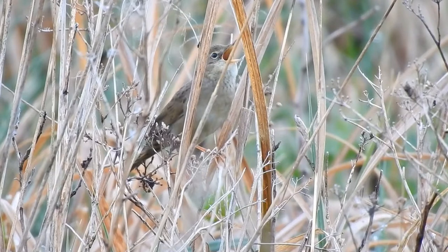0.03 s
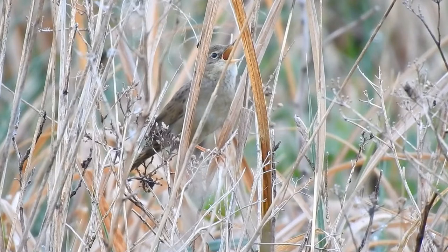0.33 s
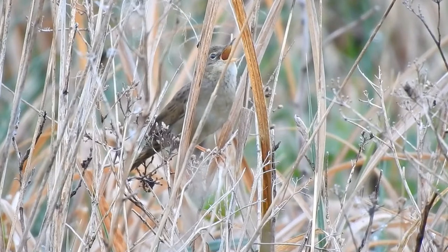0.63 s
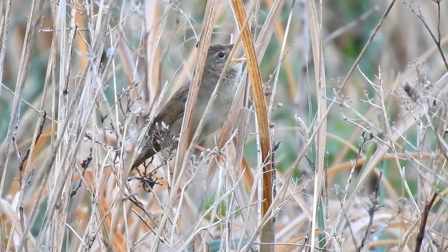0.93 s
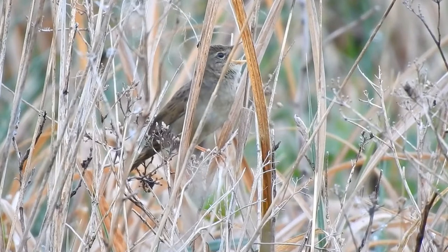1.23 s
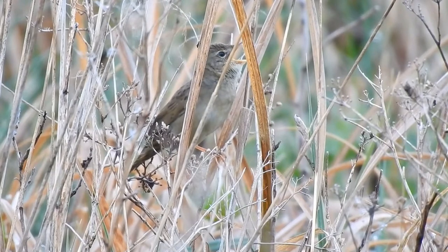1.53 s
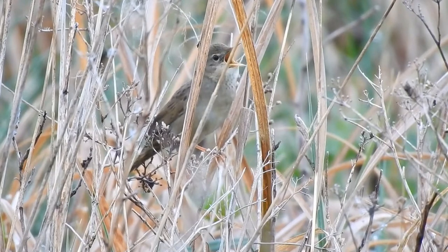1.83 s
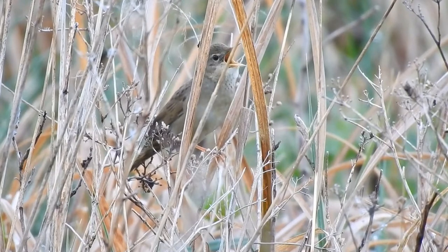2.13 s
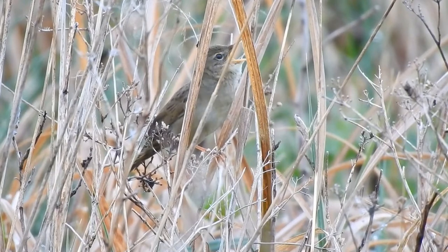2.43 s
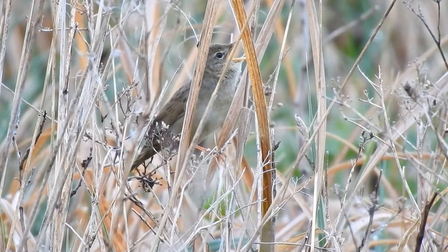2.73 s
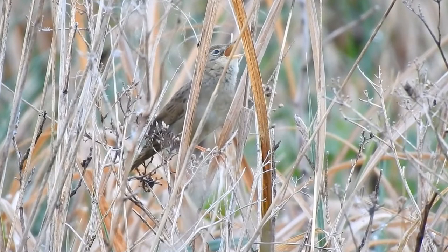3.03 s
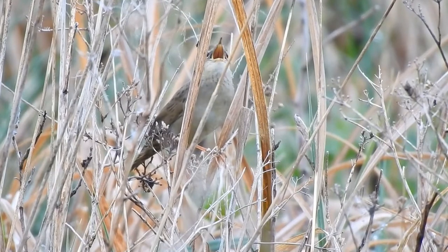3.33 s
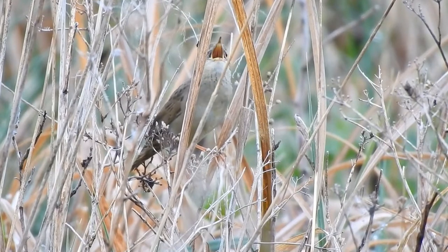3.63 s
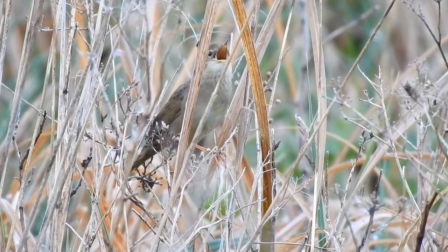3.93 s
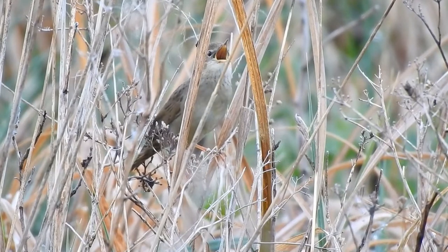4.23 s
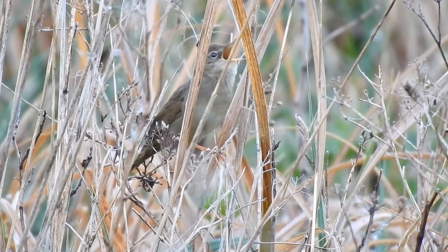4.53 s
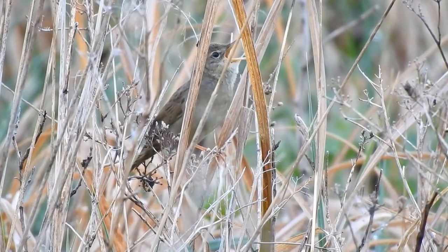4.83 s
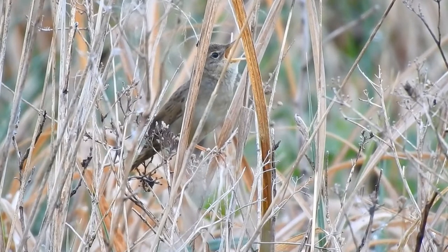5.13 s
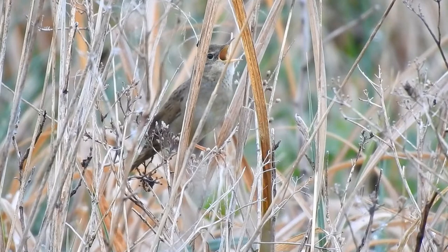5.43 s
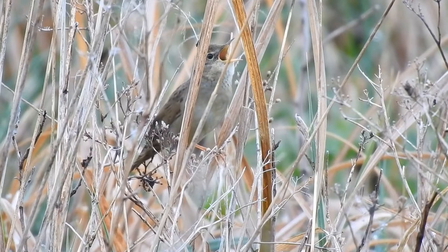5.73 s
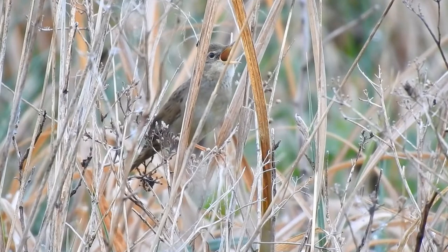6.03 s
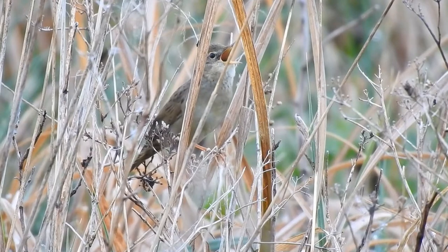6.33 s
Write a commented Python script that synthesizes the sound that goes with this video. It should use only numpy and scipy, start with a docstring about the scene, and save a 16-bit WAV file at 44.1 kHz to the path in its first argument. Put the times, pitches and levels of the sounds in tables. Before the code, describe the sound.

A small warbler sings close to the microphone in an open reed bed. Its song is one unbroken, very high, insect-like trill of rapid ticks and tiny pure notes, with a soft hiss around it. Far birds whistle faintly throughout and now and then give hoarse calls, a little more often toward the end. A soft wash of open air and a low rumble lie underneath.

```python
"""A reed bed in the open air. A soft wash and a low rumble lie underneath, and far birds call
hoarsely (sliding bands of noise) and whistle (bending sine tones). Up close a small warbler reels
about 26 syllables a second, each a sharp rising tick and a short pure note from its syrinx.
Stems scatter the song back, a soft hiss swells with it, and the top treble flickers."""
import sys
import numpy as np
from scipy import signal
from scipy.fft import rfft, irfft, next_fast_len
from scipy.io import wavfile
from scipy.ndimage import uniform_filter1d

SR = 44100
rng = np.random.default_rng(int(sys.argv[2]) if len(sys.argv) > 2 else 0)


def transcribe(u):
    """Save the signal u as a 16-bit wav file named by the first command-line argument.

    u: samples, shape (n,) or (channels, n), limited to [-1, 1]; the rate is SR.
    q: integer samples, one column per channel.
    """
    v = np.clip(np.atleast_2d(u).T, -1, 1)
    q = np.round(v * 32767).astype(np.int16)
    wavfile.write(sys.argv[1], SR, q)


N = 280917


def amp(db):
    """Decibels to gain."""
    return 10 ** (np.asarray(db) / 20)


def unit_rms(x):
    """Scales to rms 1."""
    return x / np.sqrt(np.mean(x ** 2) + 1e-20)


def curve_at(curve, s):
    """Reads an automation curve at times s."""
    return np.interp(s, *np.transpose(curve))


def spectrum_at(points, hz):
    """Reads a spectrum on a log-frequency axis."""
    knots_hz, value = np.transpose(points)
    return np.interp(np.log(hz + 1), np.log(knots_hz + 1), value)


def add(mix, s, sound):
    """Drops a sound into the mix at time s, trimmed to fit."""
    start = round(s * SR)
    sound = sound[..., max(-start, 0):]
    part = mix[..., max(start, 0):][..., :sound.shape[-1]]
    part += sound[..., :part.shape[-1]]


def pan(balance_db):
    """Left and right gains; positive leans left."""
    return amp([[balance_db / 2], [-balance_db / 2]])


def wander(n, top_hz):
    """Random modulation of rms about 1, rolling off above top_hz."""
    hz = np.fft.rfftfreq(n + SR, 1 / SR)
    return unit_rms(irfft(rfft(rng.standard_normal(n + SR)) / (1 + (hz / top_hz) ** 4)))[:n]


def coloured_noise(spectrum):
    """Two independent channels of noise with the given spectrum, rms about 1."""
    size = next_fast_len(N)
    colour = amp(spectrum_at(spectrum, np.fft.rfftfreq(size, 1 / SR)))
    return unit_rms(irfft(rfft(rng.standard_normal((2, size))) * colour, size))[:, :N]


def reverb(x, t60_s, onset_s):
    """Scattered sound: x through a diffuse tail of energy 1, different at each ear."""
    t = np.arange(SR) / SR
    tail = rng.standard_normal((2, SR)) * 1e-3 ** (t / t60_s) * (1 - np.exp(-t / onset_s))
    tail /= np.linalg.norm(tail, axis=1, keepdims=True)
    return signal.fftconvolve(x[None], tail, axes=1)[:, :N]


# Tone of the outdoor bed: freq_hz, relative_density_db
WASH_SPECTRUM = [(20, -30), (40, -20.5), (62, 3.5), (95, 0), (130, -5), (200, -16), (400, -17),
                 (1050, -13.5), (1600, -18.5), (2600, -21), (3700, -23.5), (8500, -34.5), (15500, -44),
                 (17000, -52.5)]
# Its stereo width, where 1 is fully coherent: freq_hz, coherence_ratio
WASH_COHERENCE = [(60, 1), (250, 0.76), (1000, 0.82), (3000, 0.53), (12000, 0.9)]
# Its lean: freq_hz, left_minus_right_db
WASH_BALANCE = [(60, -1.5), (200, 0.5), (500, 0), (1000, 2.5), (2500, -1.5), (9000, -0.5)]
# Slow rides on its bands around 350 Hz and 1 kHz: time_s, low_gain_db, mid_gain_db
WASH_DRIFT = [(0, 1.5, 1.5), (1.599, 2, 2.5), (2.802, 3, -0.5), (4.199, 5, -1.5), (5.401, 5, -0.5),
              (6.4, 7.5, -1)]


def outdoor_wash(level_db=-50, patchy_db=2.5, steady_below_hz=200):
    """Steady distant rumble, nearly mono, under an airy hiss with drifting patches."""
    frame, hop = 4096, 1024
    hz = np.fft.rfftfreq(frame, 1 / SR)
    t = np.arange(0, N + frame + hop, hop) / SR
    noise = rng.standard_normal((5, len(t), len(hz)))
    left, independent = noise[0] + 1j * noise[1], noise[2] + 1j * noise[3]
    patches = uniform_filter1d(noise[4], size=6, axis=0)
    patches = unit_rms(uniform_filter1d(patches, size=24, axis=1)) * hz / (hz + steady_below_hz)
    s, low_db, mid_db = np.transpose(WASH_DRIFT)
    low_band = spectrum_at([(180, .053), (350, 1), (700, .36)], hz)
    mid_band = spectrum_at([(450, .35), (1000, .99), (2200, 0)], hz)
    drift_db = np.outer(np.interp(t, s, low_db), low_band) + np.outer(np.interp(t, s, mid_db), mid_band)
    coherence = spectrum_at(WASH_COHERENCE, hz)
    right = coherence * left + np.sqrt(1 - coherence ** 2) * independent
    lean = amp(spectrum_at(WASH_BALANCE, hz) / 2)
    spectra = np.array([left * lean, right / lean])
    spectra *= amp(spectrum_at(WASH_SPECTRUM, hz) + patchy_db * patches + drift_db)
    _, bed = signal.istft(spectra.swapaxes(1, 2), nperseg=frame, noverlap=frame - hop)
    return amp(level_db) * unit_rms(bed[:, :N])


# Cues for the hoarse far birds: start_s, length_s, start_hz, end_hz, width_hz, relative_level_db
HOARSE_CUES = [(0.649, 0.26, 2210, 2023, 595, -56), (1.599, 0.49, 1848, 1960, 400, -57.5),
               (3.001, 0.63, 2017, 1932, 350, -56), (4.1, 0.34, 1947, 1907, 400, -59),
               (4.464, 0.3, 2117, 1874, 320, -51.5), (4.719, 0.53, 1960, 1867, 278, -54.5),
               (5.702, .65, 2150, 1890, 604, -52.5), (5.933, 0.22, 2090, 1904, 260, -53),
               (5.96, 0.23, 2317, 2300, 301, -54.5)]


def hoarse_calls(level_db=-3, skirt_db=-7, skirt_spread=1.4, wet_db=-4, balance_db=-5):
    """Rough calls so far away that each is smeared into one sliding band with broad skirts."""
    calls = np.zeros(N)
    for s, length_s, start_hz, end_hz, width_hz, db in HOARSE_CUES:
        n = int(length_s * SR)
        carrier = np.exp(2j * np.pi * np.cumsum(np.linspace(start_hz, end_hz, n)) / SR)
        core, skirt = (wander(n, hz) + 1j * wander(n, hz)
                       for hz in (width_hz / 2, width_hz * skirt_spread))
        band = ((core + amp(skirt_db) * skirt) * carrier).real
        add(calls, s, amp(db) * band * signal.windows.tukey(n, 3 / 5))
    tail = amp(wet_db) * reverb(calls, t60_s=.69, onset_s=.021)
    return amp(level_db) * pan(balance_db) * (calls + tail)


def faint_whistle_cues(slot_s=.2, length_s=(.036, .075), pitch_hz=(2544, 3070), bend_hz=230, db=-60):
    """One short whistle in every time slot, random in onset, length, pitch and bend."""
    slots = np.arange(0, N / SR, slot_s)
    cues = []
    for s, (late, long, high, *bend) in zip(slots, rng.random((len(slots), 6))):
        contour_hz = np.interp(high, [0, 1], pitch_hz) + bend_hz * (2 * np.array(bend) - 1)
        cues.append((s + slot_s * late, np.interp(long, [0, 1], length_s), *contour_hz, db))
    return cues


def dipping_whistle_cues(first_s=2.872, every_s=.1328, length_s=.08, db=-55.5):
    """One far bird repeats a dipping whistle six times at an even pace."""
    contour_hz = (3190, 2440, 3690)
    return [(first_s + k * every_s, length_s, *contour_hz, db) for k in range(6)]


# Cues for the clearer far whistles: start_s, length_s, start_hz, middle_hz, end_hz, level_db
WHISTLE_CUES = [(0.143, 0.16, 2920, 3110, 3250, -62), (0.354, .097, 2640, 2660, 2500, -57),
                (.69, 0.11, 2850, 2530, 2500, -62.5), (0.93, 0.082, 3050, 2650, 2590, -54.5),
                (1.028, .08, 2570, 2640, 2570, -56), (1.29, 0.16, 2660, 2540, 2440, -62.5),
                (2.2, .048, 2860, 2830, 2620, -59.5), (2.272, .038, 2800, 2650, 2500, -59),
                (2.412, 0.16, 3430, 3390, 3480, -59), (2.76, 0.038, 2650, 2960, 3150, -58),
                (3.683, 0.062, 3250, 2480, 2750, -55.5), (3.996, 0.11, 2680, 2650, 2700, -58.5),
                (4.691, 0.11, 2950, 2400, 2520, -58), (4.837, 0.059, 2950, 3070, 3050, -58),
                (4.929, 0.065, 3240, 2650, 2495, -54.5), (5.0, 0.14, 2520, 2540, 2280, -60),
                (5.332, .1, 2650, 3110, 2550, -53.5), (5.472, .089, 2700, 3150, 2480, -55),
                (5.528, 0.065, 2440, 2470, 2360, -56.5), (5.69, 0.088, 2780, 2700, 2540, -54.5),
                (5.79, 0.069, 2700, 2490, 2750, -52.5), (5.82, .07, 3160, 3080, 2970, -54.5),
                (6.195, 0.085, 2680, 3110, 2560, -54.5), (6.33, 0.045, 2980, 2560, 2500, -57),
                (6.335, 0.066, 2940, 3130, 3100, -51.5)]


def far_whistles(waver_share=.011, flutter_db=3.5, wet_db=-4.5, balance_db=-1):
    """Arched and dipping sine whistles, a little blurred by distance."""
    whistles = np.zeros(N)
    for s, length_s, *contour_hz, db in WHISTLE_CUES + dipping_whistle_cues() + faint_whistle_cues():
        n = int(length_s * SR)
        arch = np.polyfit([0, 1 / 2, 1], contour_hz, 2)
        hz = np.polyval(arch, np.linspace(0, 1, n)) * (1 + waver_share * wander(n, top_hz=120))
        envelope = amp(db + flutter_db * wander(n, top_hz=77)) * signal.windows.tukey(n, 1 / 6)
        add(whistles, s, envelope * np.sin(2 * np.pi * np.cumsum(hz) / SR))
    tail = amp(wet_db) * reverb(whistles, t60_s=.44, onset_s=.016)
    return pan(balance_db) * (whistles + tail)


# Tone of the treble flicker: freq_hz, relative_density_db
FLICKER_SPECTRUM = [(2000, -13.5), (4000, -2.5), (8500, 3.5), (12000, -0.5), (16000, -5.5)]


def treble_flicker(song, level_db=-38, open_share=.3, balance_db=2):
    """Faint bright fizz rides the song's envelope, gated at random so only some pulses carry it."""
    fizz = coloured_noise(FLICKER_SPECTRUM)
    chance = wander(N, top_hz=38)
    is_open = chance > np.quantile(chance, 1 - open_share)
    gate = uniform_filter1d(is_open.astype(float), size=100)
    envelope = abs(signal.hilbert(song))
    return amp(level_db) * pan(balance_db) * envelope * gate * fizz


# Tone of the hiss around the song band: freq_hz, relative_density_db
SHIMMER_SPECTRUM = [(3300, -43.5), (4100, -28.5), (4700, -8), (5100, -4.5), (5400, 0.5), (6500, -1),
                    (6900, -2.5), (7250, -13.5), (7600, -17), (8100, -35.5), (9000, -56)]


def shimmer(song, level_db=-21, pulse_weight=.043, side_db=-9):
    """A soft hiss swells with the song and lingers between its pulses."""
    mid, side = coloured_noise(SHIMMER_SPECTRUM)
    side *= amp(side_db)
    syllable_power = uniform_filter1d(song ** 2, size=1690)
    pulse_power = uniform_filter1d(song ** 2, size=60)
    envelope = np.sqrt(abs(syllable_power + pulse_weight * pulse_power))
    return amp(level_db) * envelope * np.array([mid + side, mid - side])


# Echo taps off the nearest stems and the ground: delay_ms, left_db, right_db
STEM_ECHOES = [(4.713, -29.5, -14), (7.63, -26.5, -33), (9.36, -29, -24.5), (11.8, -45, -27.5),
               (14.52, -37, -28.5), (16.97, -32, -32), (20.67, -40, -23.5), (24.98, -37, -33.5),
               (25.6, -38.5, -15), (28.56, -29, -31), (29.56, -42.5, -26.5), (33.76, -35.5, -22)]


def reed_bed(song, direct_balance_db=-.7, near_db=-19, far_db=-25, tail_balance_db=-3):
    """Direct song, single echoes off near stems, and the scatter of the whole reed bed."""
    size = next_fast_len(N + SR)
    khz = np.fft.rfftfreq(size, 1000 / SR)
    echoes = sum(amp([[left_db], [right_db]]) * np.exp(-2j * np.pi * khz * delay_ms)
                 for delay_ms, left_db, right_db in STEM_ECHOES)
    early = irfft(rfft(song, size) * (pan(direct_balance_db) + echoes), size)[:, :N]
    near_tail = amp(near_db) * reverb(song, t60_s=.19, onset_s=.002)
    far_tail = amp(far_db) * reverb(song, t60_s=.41, onset_s=.016)
    return early + pan(tail_balance_db) * (near_tail + far_tail)


def throat(song, cutoff_hz=7130, steepness=40, leak_db=-15):
    """Throat and beak pass the song band and drop steeply to a low shelf above it."""
    size = next_fast_len(N + SR)
    hz = np.fft.rfftfreq(size, 1 / SR)
    passed = 1 / (1 + (hz / cutoff_hz) ** steepness)
    return irfft(rfft(song, size) * (passed + amp(leak_db) * (1 - passed)), size)[:N]


def syrinx_pulse(contour, pitch_scale, stretch, uneven_db=2, pad=9):
    """One sine pulse of the syrinx along a contour of pitch and smoothed level."""
    ms, pitch, db = np.transpose(contour)
    knots_s = ms * stretch / 1000
    t = np.arange(-pad, knots_s[-1] * SR + pad) / SR
    weakness = 1 - amp(np.minimum(db, 0))  # weak parts vary most
    db = db + uneven_db * rng.standard_normal(len(db)) * weakness
    smoothing = np.hanning(2 * pad) / (pad - 1 / 2)
    envelope = np.convolve(np.interp(t, knots_s, amp(db), 0, 0), smoothing, "same")
    hz = pitch_scale * np.interp(t, knots_s, pitch)
    return envelope * np.sin(2 * np.pi * np.cumsum(hz) / SR)


# Tempo of the reel: time_s, syllable_rate_hz
REEL_TEMPO = [(0.0, 26.235), (0.8, 26.109), (1.8, 26.308), (2.0, 26.262), (3.2, 26.216), (3.6, 25.904),
              (3.8, 26.064), (4.4, 26.033), (5.0, 26.293), (5.2, 25.906), (5.8, 26.08), (6.0, 26.502),
              (6.4, 25.505)]


def syllable_times(first_s=-.003):
    """One syllable onset for each whole cycle of the tempo."""
    t = first_s + np.arange(N) / SR
    cycles = np.cumsum(curve_at(REEL_TEMPO, t)) / SR
    return np.interp(np.arange(np.ceil(cycles[-1])), cycles, t)


# The tick sweeps up, then trails off weakly: time_ms, pitch_hz, relative_level_db
TICK_CONTOUR = [(.1, 4640, -42), (.45, 5380, -15.4), (.8, 6020, -3.1), (1.3, 6210, 0), (1.6, 6550, -.9),
                (1.95, 6960, -10.8), (2.45, 6390, -5.1), (3.1, 6310, -19.7), (3.6, 5320, -21.2),
                (4.6, 6470, -12), (5.8, 5840, -23), (7, 6420, -13.7), (8.2, 6580, -20.5),
                (9.6, 6590, -34.7)]
# The note sags gently: time_ms, pitch_ratio, relative_level_db
NOTE_CONTOUR = [(0, 1.02, -34), (.5, 1.017, -11), (.8, 1.014, -4.5), (1.3, 1.01, -1), (2.4, .999, .3),
                (3.1, .994, -.4), (3.6, .99, -3.2), (4.2, .972, -8.5), (4.8, .958, -11.5), (5.9, .965, -32)]
# The note's tuning drifts a little along the reel: time_s, pitch_hz
NOTE_TUNING = [(0, 5770), (1.4, 5798), (3.9, 5756), (6.4, 5730)]
# Strength of the song as the bird pushes and turns its head: time_s, effort_db
SONG_EFFORT = [(0.0, -10), (0.9, -9.5), (1.0, -13.5), (1.1, -12), (2.0, -10.5), (2.5, -11), (2.7, -12.5),
               (3.0, -12), (3.6, -9.5), (4.6, -9.5), (4.8, -12.5), (4.9, -10.9), (5.1, -12), (5.7, -10.7),
               (5.8, -11.5), (5.9, -10.6), (6.0, -12), (6.4, -10)]


def warbler(tick_db=1.67, note_db=-1.12, note_delay_ms=12.03):
    """Tick and note alternate, both following the effort; no two syllables are quite alike."""
    tick_follows, note_follows = 1.123, .9  # dB per dB of effort
    tick_jitter_db, note_jitter_db, jitter_hz, jitter_ms = .5, .71, 10, .2
    shape_jitter = np.array([.007, .03, .08])  # shares of tick pitch, tick length, note length
    push_hz_per_db = 19  # a note pushed harder is also a little higher
    song, onsets = np.zeros(N), syllable_times()
    for s, chance in zip(onsets, rng.standard_normal((len(onsets), 7))):
        late, tick_push, note_push, detune = chance[:4]
        tick_pitch, tick_stretch, note_stretch = 1 + shape_jitter * chance[4:]
        effort_db = curve_at(SONG_EFFORT, s)
        tick_gain = amp(tick_db + tick_follows * effort_db + tick_jitter_db * tick_push)
        add(song, s, tick_gain * syrinx_pulse(TICK_CONTOUR, tick_pitch, tick_stretch))
        push_db = note_jitter_db * note_push
        note_gain = amp(note_db + note_follows * effort_db + push_db)
        note_hz = curve_at(NOTE_TUNING, s) + push_hz_per_db * push_db + jitter_hz * detune
        note_s = s + (note_delay_ms + jitter_ms * late) / 1000
        add(song, note_s, note_gain * syrinx_pulse(NOTE_CONTOUR, note_hz, note_stretch))
    return song


def scene():
    """The near warbler among its reeds, over far birds and the open air."""
    song = throat(warbler())
    foreground = reed_bed(song) + shimmer(song) + treble_flicker(song)
    return foreground + far_whistles() + hoarse_calls() + outdoor_wash()


def record(dry):
    """A steep low-pass trims the very top of the mix."""
    lowpass = signal.firwin(255, cutoff=16100, window=("kaiser", 8), fs=SR)
    return signal.oaconvolve(dry, lowpass[None], "same")


dry = scene()
out = record(dry)
transcribe(out)
```